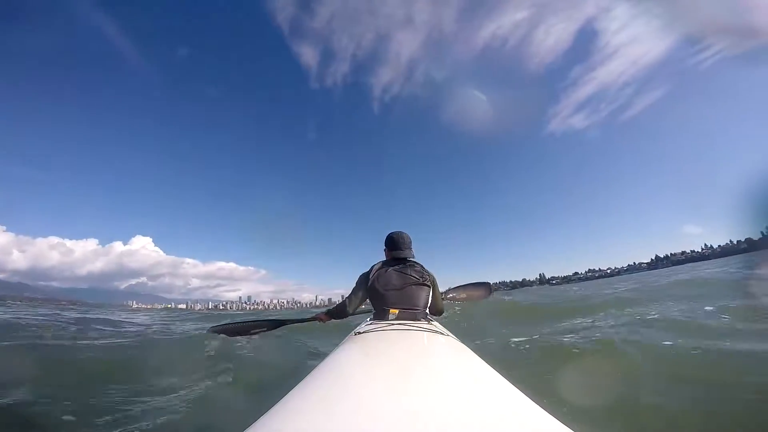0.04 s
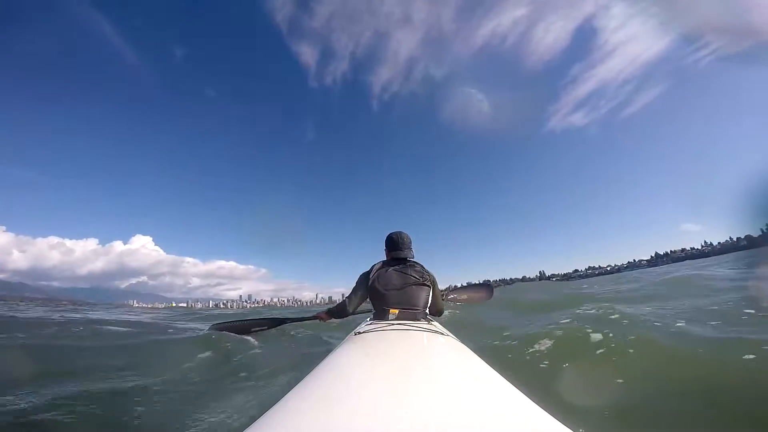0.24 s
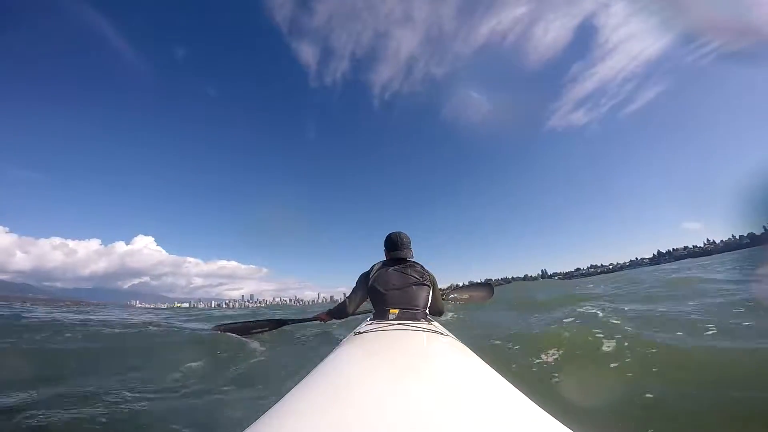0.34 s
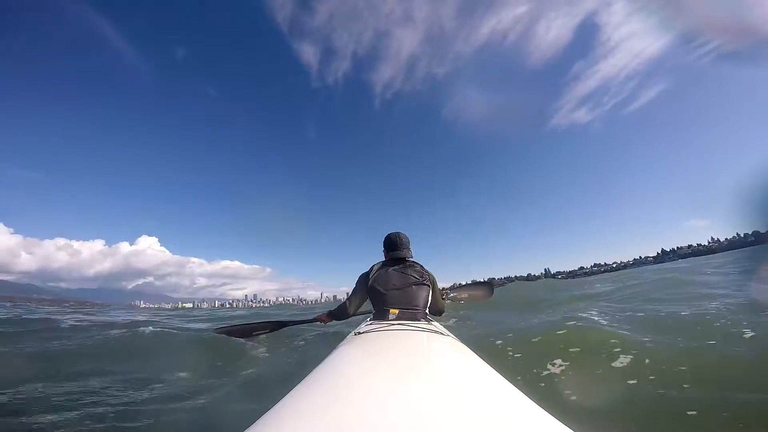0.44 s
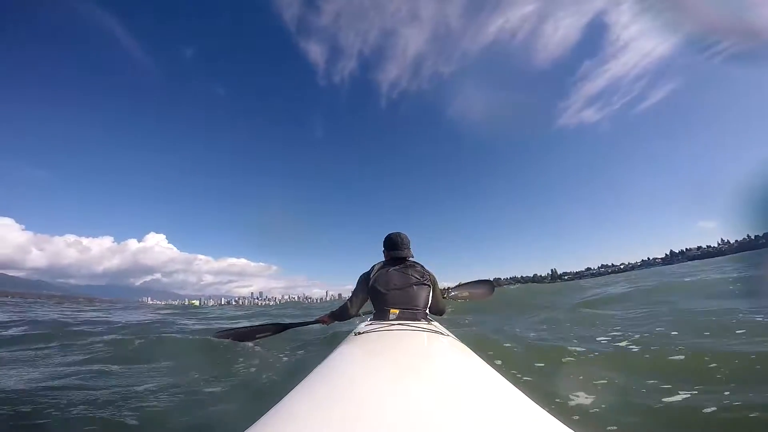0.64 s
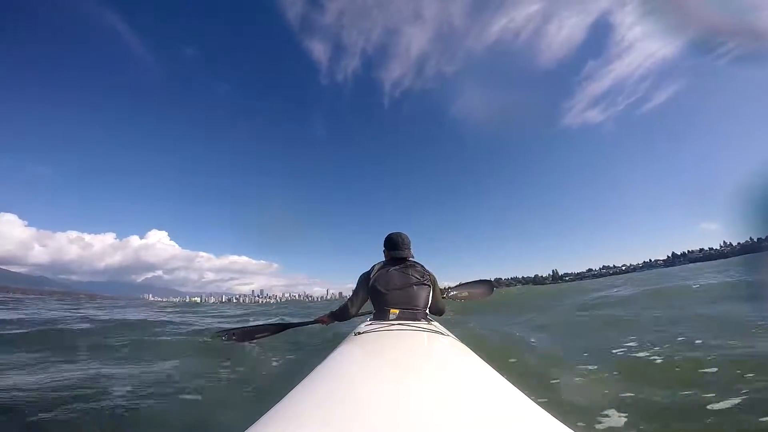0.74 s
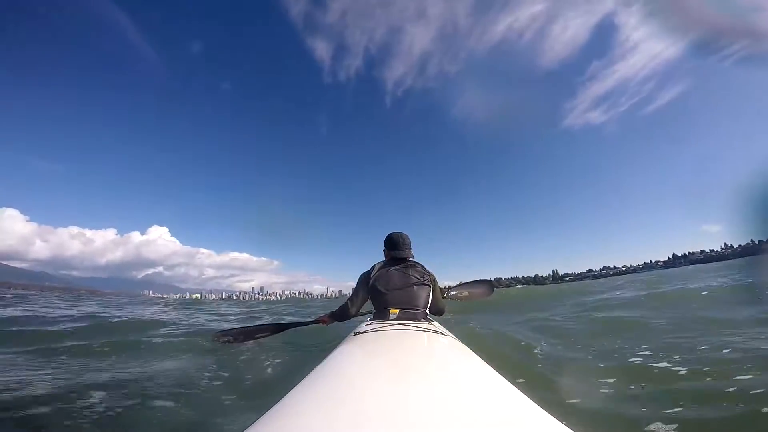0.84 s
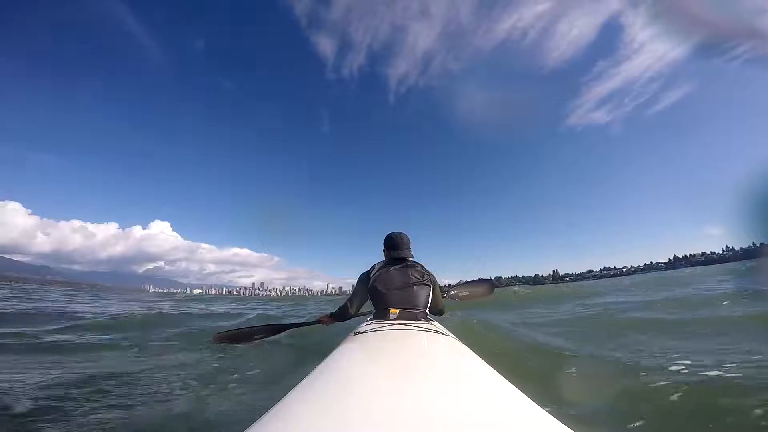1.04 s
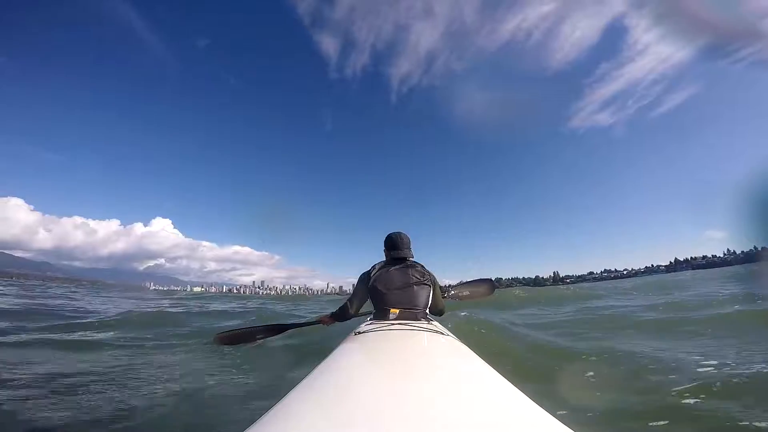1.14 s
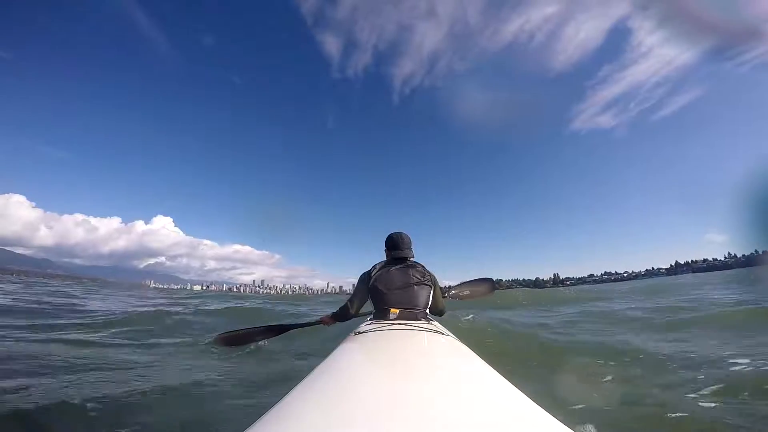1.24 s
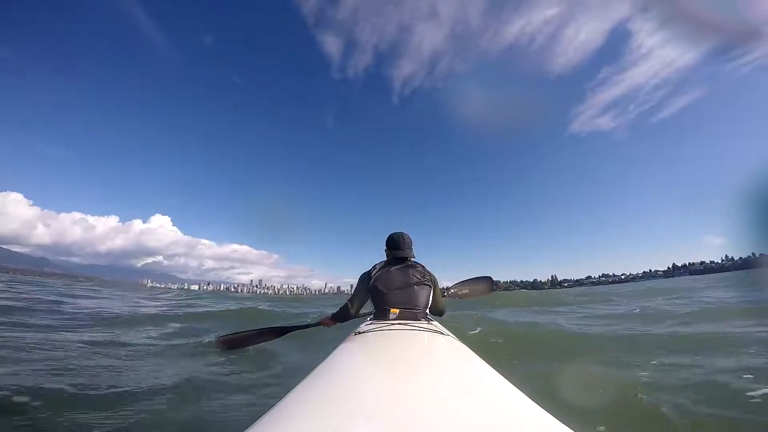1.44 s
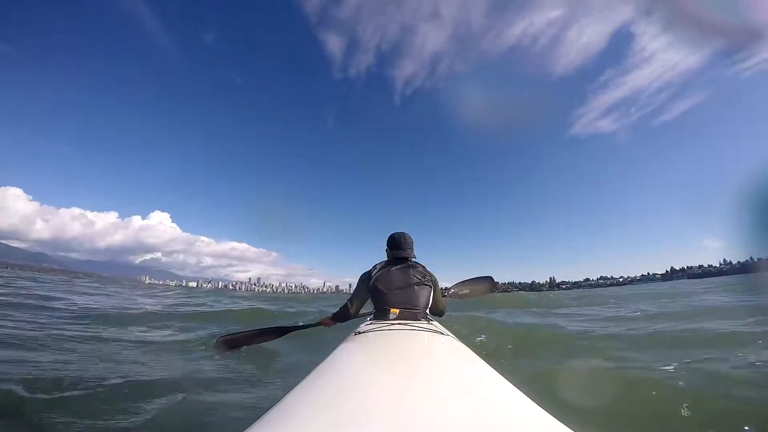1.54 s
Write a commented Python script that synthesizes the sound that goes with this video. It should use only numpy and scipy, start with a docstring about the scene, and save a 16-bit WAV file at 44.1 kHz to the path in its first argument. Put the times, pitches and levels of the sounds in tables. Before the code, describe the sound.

Water slaps against a kayak hull, close up, starting lightly at about 0.1 seconds and quickening. From 0.3 to 0.5 seconds the slaps are loudest, the hollow shell drones and low wind buffets the microphone. Muffled laps and plops follow around 0.6 seconds and again, softer, near 0.9. The wind eases from 0.7, leaving tiny plops and a faint sea wash and hiss until 1.6 seconds.

```python
"""A kayak in choppy water, heard close up from a camera microphone fixed to its deck.
Wind buffets the housing over a low hull hum, the distant wash of the sea and a faint hiss.
A wave chatters along the hull in quickening slaps that set the shell droning, then lets go.
Afterwards water laps and plops beside the boat, muffled by the sealed housing, as the wind eases."""
import sys
import numpy as np
from scipy import signal
from scipy.fft import rfft, irfft
from scipy.io import wavfile
from scipy.ndimage import uniform_filter1d

SR = 44100
rng = np.random.default_rng(int(sys.argv[2]) if len(sys.argv) > 2 else 0)


def materialize(psi):
    """Save the field psi as 16-bit PCM at rate SR to the path in sys.argv[1].

    A 1-D psi becomes a single channel; in a 2-D psi each row is a channel.
    """
    bounded = np.clip(np.atleast_2d(psi).T, -1, 1)
    quanta = np.round(bounded * 32767).astype(np.int16)
    wavfile.write(sys.argv[1], SR, quanta)


N = 70560


def undb(db):
    return 10 ** (np.asarray(db) / 20)


def unit(x):
    """Scale to rms 1."""
    return x / np.sqrt(np.mean(x ** 2) + 1e-24)


def curve(rows):
    """Gain over time from rows of time_s, level_db."""
    return undb(np.interp(np.arange(N) / SR, *np.array(rows).T))


def drift(rate_hz):
    """Smooth random drift of rms 1."""
    size = max(int(SR / rate_hz), 2)
    steps = np.repeat(rng.standard_normal(N // size + 1), size)
    return unit(uniform_filter1d(uniform_filter1d(steps, size), size)[:N])


def colour(x, points):
    """Causal filter of unit power through rows of freq_hz, gain_db."""
    hz, db = np.array(points).T
    bins_hz = np.arange(N + 1) * SR / (2 * N)
    gain = undb(np.interp(np.log(bins_hz + 1), np.log(hz), db))
    cepstrum = irfft(np.log(unit(gain)))
    cepstrum[1:N] *= 2  # fold to minimum phase
    cepstrum[N + 1:] = 0
    return irfft(rfft(x, 2 * N) * np.exp(rfft(cepstrum)))[:N]


def noise(points):
    """Coloured noise of rms 1."""
    return unit(colour(rng.standard_normal(N), points))


def even(x, span_s):
    """Hold the short-term level of a noise at 1."""
    power = uniform_filter1d(x ** 2, max(int(span_s * SR), 2))
    return x / np.sqrt(np.abs(power) + 1e-12)


def envelope(start_s, rise_s, decay_s, hold_s=0):
    """Linear rise, hold, exponential decay."""
    age = np.arange(N) / SR - start_s
    return np.clip(age / rise_s, 0, 1) * np.exp(-np.maximum(age - rise_s - hold_s, 0) / decay_s)


def tone(hz, wander, rate_hz):
    """A sine of rms 1 whose pitch wanders by a fraction of itself."""
    pitch_hz = hz * (1 + wander * drift(rate_hz))
    return np.sqrt(2) * np.sin(2 * np.pi * np.cumsum(pitch_hz) / SR)


def wind():
    """Rumble buffets the housing right at the microphone and peaks with the wave, over a deep sway of air."""
    # time_s, level_db
    gust_levels = [(0, -54), (.13, -38.5), (.26, -38), (.288, -23), (.37, -20.5), (.47, -21), (.53, -23.5),
                   (.58, -21), (.61, -29), (.72, -31), (.85, -39.5), (1.02, -45), (1.3, -47.5),
                   (1.6, -54.5)]
    # freq_hz, gain_db
    gust_colour = [(10, -46), (24, -17), (42, 1), (80, 3.5), (115, 3.5), (160, -10), (210, -17),
                   (330, -27.5), (700, -69), (3000, -100)]
    # freq_hz, gain_db
    sway_colour = [(10, -27.5), (22, -10), (35, 0.5), (55, -6), (100, -23.5), (1000, -100)]
    buffeting = undb(drift(rate_hz=35))
    gusts = even(noise(gust_colour), span_s=0.039) * curve(gust_levels) * buffeting
    return gusts + noise(sway_colour) * undb(-47)


def sea_wash():
    """The sea in the distance: a soft noise whose level flickers."""
    # freq_hz, gain_db
    wash_colour = [(40, -19), (150, 1), (300, -8.5), (600, -1), (1000, -4.5), (2000, -6), (2800, -11.5),
                   (4000, -24), (8000, -56)]
    # time_s, level_db
    wash_levels = [(0, -62), (.78, -59.5), (1.1, -62), (1.2, -65.5), (1.43, -65), (1.6, -62)]
    return noise(wash_colour) * curve(wash_levels) * undb(2.1 * drift(rate_hz=30))


def hiss():
    """A faint, steady hiss behind everything."""
    # freq_hz, gain_db
    hiss_colour = [(100, 0), (3000, -3), (5000, -2.5), (7000, -6.5), (10000, -8.5), (14000, -12.5),
                   (16000, -22.5)]
    return noise(hiss_colour) * undb(-67.5)


def hull():
    """Two low resonances of the shell under the microphone, kept ringing by the passing water."""
    # time_s, level_db
    hum_levels = [(0, -50), (.07, -38.5), (.16, -35), (.22, -44), (.27, -58), (.6, -56), (.8, -55.5),
                  (1.02, -53.5), (1.085, -40.5), (1.16, -55.5), (1.6, -59.5)]
    # time_s, level_db
    drone_levels = [(.16, -57), (.27, -44.5), (.295, -48), (.305, -21), (.318, -27.5), (.352, -20.5),
                    (.37, -20.5), (.39, -23.5), (.44, -20.5), (.485, -24.5), (.52, -40.5), (.57, -39),
                    (.62, -46.5), (.85, -81.5)]
    hum_flutter_db, drone_flutter_db = 1.5, 3
    drone = tone(235.4, wander=0.023, rate_hz=61) * curve(drone_levels)
    drone *= undb(drone_flutter_db * drift(rate_hz=71))
    hum = tone(122.35, wander=0.049, rate_hz=36) * curve(hum_levels)
    hum *= undb(hum_flutter_db * drift(rate_hz=57))
    return hum + drone


def slaps():
    """Each slap is a crack and a short rush of water; heavy ones reach more of the hull's resonances."""
    # the wave's hits on the hull: start_s, level_db, weight (0 light and hollow, 1 full blow)
    hits = [(0.071, -46, 0.89), (0.108, -35, 0), (.121, -31.5, 0), (.137, -31, 0.12), (0.152, -27, 0),
            (.171, -27, 0.12), (0.189, -36, 0), (.208, -25, 0.8), (.233, -26, 0.67), (.256, -25.5, 0.85),
            (.277, -22.5, 0.0056), (.295, -14, 1), (.318, -16, 0.78), (0.334, -15, 1), (.350, -22, 0.66),
            (0.37, -16, 1), (0.386, -13.5, 1), (0.395, -13.5, 1), (0.409, -13.5, 1), (0.421, -16, 1),
            (0.435, -12.5, 1), (.452, -19, 1), (.465, -15.5, 0.87), (0.479, -17.5, 1), (0.5, -18, 0.46)]
    # water churning between the slaps: time_s, level_db
    churn_levels = [(0, -55), (.09, -45.5), (.2, -45), (.225, -34), (.29, -34), (.34, -22.5), (.46, -24),
                    (.49, -31), (.515, -37.5), (.545, -51), (.57, -71.5)]
    # band of the water's push: freq_hz, gain_db
    rush_colour = [(1600, 0.5), (2400, -5), (4000, -6), (6000, -52)]
    # the hull under a light slap: freq_hz, gain_db
    light_colour = [(40, -39.5), (150, -18.5), (280, -11), (400, -7), (490, 6.5), (690, -10.5), (920, 6),
                    (1150, -10.5), (1600, -27), (1930, -12.5), (2300, -32), (3000, -32), (4000, -81.5),
                    (7000, -86.5)]
    # the hull under a full blow: freq_hz, gain_db
    full_colour = [(30, -39), (150, -2.5), (300, -1.5), (620, -0.5), (800, -9), (1030, 2.5), (1220, -14),
                   (1420, -6.5), (1750, -17.5), (2000, -21), (2160, -11.5), (2400, -27), (2780, -24),
                   (3200, -44), (4200, -57.5), (7000, -97)]
    rise_s, crack_db, rush_db = 0.002017, 11, -9.5
    power, cracks = curve(churn_levels) ** 2, np.zeros(N)
    for start, db, _ in hits:
        power += (undb(db) * envelope(start, rise_s, decay_s=0.0051, hold_s=0.0022)) ** 2
        cracks[int((start + rise_s) * SR)] += undb(db + crack_db)
    rush = np.sqrt(power) * even(noise(rush_colour), span_s=0.003) * undb(rush_db)
    push = cracks + rush
    starts, _, weights = np.array(hits).T
    weight = np.interp(np.arange(N) / SR, starts, weights).clip(0, 1)
    light = colour(push * np.sqrt(1 - weight), light_colour)
    full = hull_ring(colour(push * np.sqrt(weight), full_colour))
    return light * undb(-2.5) + full * undb(-3.5)


def hull_ring(blows):
    """The hull's narrow modes ring on after each blow."""
    # pitch_hz, gain_db
    modes = [(159, 6.5), (353, -5.5), (431, -7), (538, 1), (598, -6), (667, 5), (983, -14), (1105, -2.5),
             (1339, 0.5), (1415, -9), (1495, -6), (1556, -4), (2168, -3)]
    width_hz = 11
    ringing = np.zeros(N)
    for hz, db in modes:
        ringing += undb(db) * signal.lfilter(*signal.iirpeak(hz, hz / width_hz, fs=SR), blows)
    return blows + ringing


def laps():
    """Each lap beside the boat is a cloud of tiny, quickly damped bubbles around one pitch."""
    # start_s, level_db, centre_hz, spread_octaves, rise_s, decay_s
    clouds = [(.274, -31.5, 344, 0.34, 0.0086, 0.021), (.475, -27, 380.5, .15, 0.03044, 0.02),
              (.569, -28, 1080, 0.49, 0.0047, .005), (.6, -43, 1930, .4, 0.0058, 0.013),
              (.56, -41, 717, .6, .05, 0.051), (0.712, -54, 2070, 0.19, 0.0084, 0.026),
              (0.832, -48, 1030, 0.36, 0.0038, .018), (0.911, -40, 1050, 0.728, 0.0062, 0.036),
              (.978, -40, 828, 0.33, 0.01184, .03), (.97, -48.5, 250, 0.35, 0.029, 0.055),
              (1.059, -48.5, 930, 1.05, 0.023, 0.028), (1.248, -54, 655, 1.24, .025, 0.031),
              (1.58, -53, 552, 0.11, 0.016, 0.026)]
    bubbles_per_lap, decay_cycles = 300, 2.8
    out, age = np.zeros(N), np.arange(N // 64) / SR
    for start, db, centre_hz, octaves, rise, decay in clouds:
        length_s = rise + 5 * decay
        cloud = np.zeros(2 * N)
        for when, down, up, strength in rng.random((bubbles_per_lap, 4)):
            hz = np.clip(centre_hz * 2 ** (octaves * np.sqrt(6) * (up - down)), 150, 2900)
            cycles = hz * age
            ping = np.sin(2 * np.pi * cycles) * np.exp(-cycles / decay_cycles) * (1 - np.exp(-cycles))
            at = int((start + when * length_s) * SR)
            cloud[at:at + len(age)] += (2 * strength - 1) * np.sqrt(hz) * ping
        out += even(cloud, span_s=0.0067)[:N] * envelope(start, rise, decay) * undb(db)
    return out


def bubbles():
    """Larger single bubbles plop with a slight upward glide."""
    # start_s, pitch_hz, level_db, decay_s
    plops = [(.573, 843, -23, 0.005), (.573, 1827, -36, 0.0082), (.605, 2300, -37, 0.0044),
             (.637, 924, -26, 0.005), (0.905, 2390, -41.5, .008), (0.915, 1796, -36, 0.0087),
             (1.116, 1670, -51.5, 0.008), (1.339, 1600, -49.5, 0.0046)]
    rise_s, glide_per_s = 0.0022, 2.8
    out = np.zeros(N)
    for start, hz, db, decay in plops:
        age = np.maximum(np.arange(N) / SR - start, 0)
        phase = 2 * np.pi * hz * age * (1 + glide_per_s * age / 2)
        out += undb(db) * envelope(start, rise_s, decay) * np.sin(phase)
    return out


def housing(x, cutoff_hz):
    """The sealed case around the microphone shuts out the treble."""
    return signal.sosfilt(signal.butter(6, cutoff_hz, fs=SR, output="sos"), x)


def scene():
    """Wind, sea, hull and water as they reach the deck, in mono."""
    water = housing(laps() + bubbles(), cutoff_hz=2080)
    return (sea_wash() + slaps() + hull() + wind() + water + hiss())[None]


def record(dry):
    """The camera cuts the very top of the treble steeply."""
    cutoff_hz = 15350
    return signal.sosfilt(signal.ellip(10, .2, 80, cutoff_hz, fs=SR, output="sos"), dry)


dry = scene()
out = record(dry)
materialize(out)
```